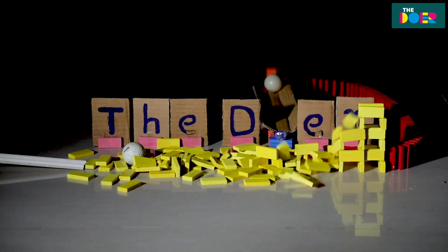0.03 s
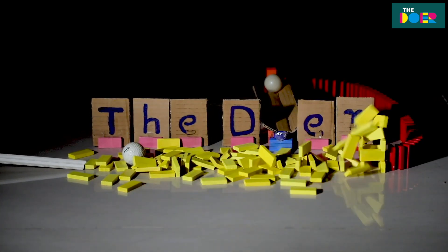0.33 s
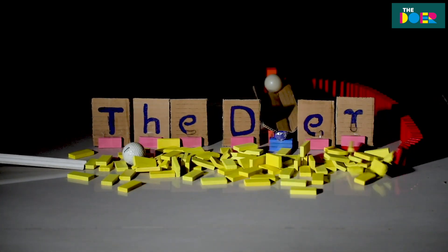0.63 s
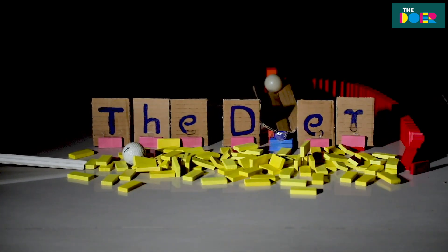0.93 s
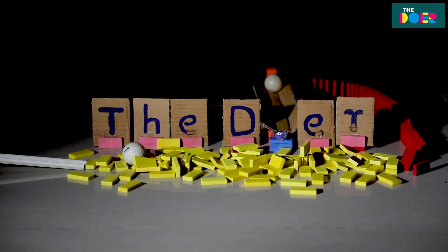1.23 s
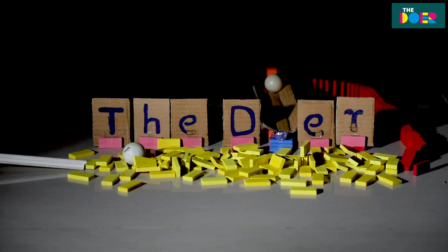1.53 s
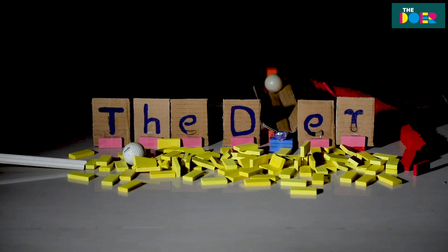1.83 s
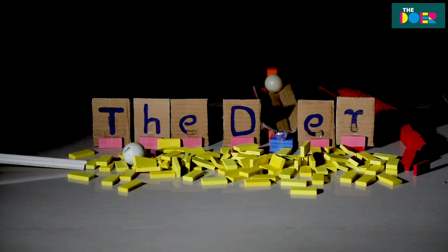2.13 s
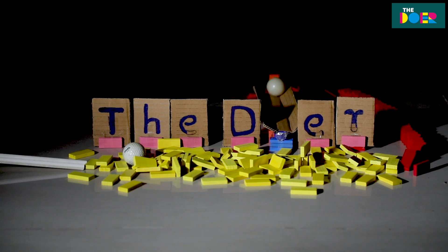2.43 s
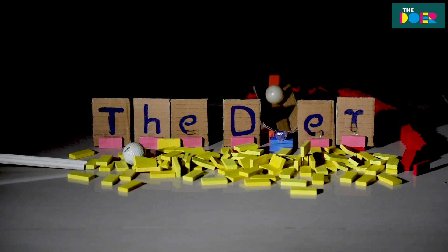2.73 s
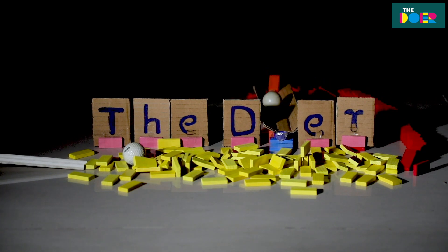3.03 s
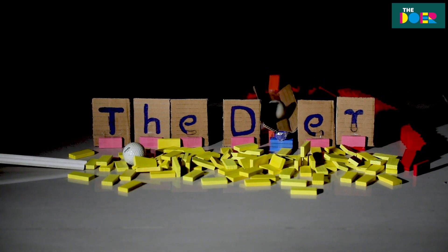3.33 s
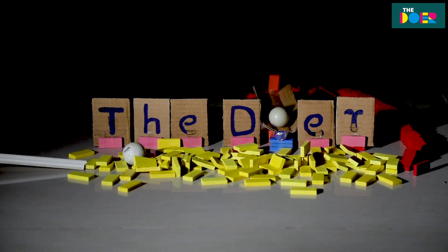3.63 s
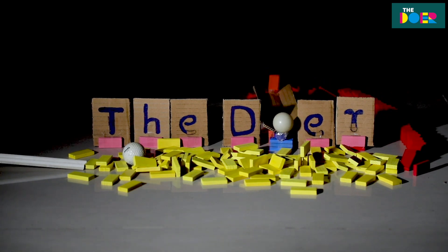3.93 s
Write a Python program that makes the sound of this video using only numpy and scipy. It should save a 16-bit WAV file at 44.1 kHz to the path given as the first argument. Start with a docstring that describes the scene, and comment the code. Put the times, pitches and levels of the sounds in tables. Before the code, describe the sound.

Small wooden blocks topple onto a hard table in a dense clatter of sharp, ringing clacks, peaking in a bright crash around 0.8 seconds. From 1 second a thinner rattle runs on, with a few hollow knocks near 2.4 seconds and a last clack at 2.5. Faint scuffs of a ball against cardboard follow from about 2.9 seconds, over the slightly echoing room's steady rush and a faint electrical whine.

```python
"""A tower of small wooden blocks topples onto a hard table in a live room. Countless small contacts
(table thud, block clack, edge tick) make a dense clatter; hard landings crack and ring at each block's
pitch. After one bright crash come a thinner rattle as a row of blocks runs on, a few hollow knocks and
a last ringing clack. Faint scuffs follow over the room's steady rush and a thin electrical whine."""
import sys
import numpy as np
from scipy import signal
from scipy.fft import rfft, irfft, next_fast_len
from scipy.io import wavfile

SR = 44100
rng = np.random.default_rng(int(sys.argv[2]) if len(sys.argv) > 2 else 0)


def dump_mix(stems):
    """Bounce the given channels to the path in sys.argv[1] as a 16-bit WAV at rate SR."""
    frames = np.atleast_2d(stems).T  # one column per channel
    limited = np.clip(frames, -1, 1)  # hard clip at full scale
    pcm = np.round(limited * 32767).astype(np.int16)
    wavfile.write(sys.argv[1], SR, pcm)


N = 176400
TICK_T60_S = 0.032
TAIL_DB, EARLY_DB = 1, -6.5  # energy re direct sound


def tumbling(contacts_per_s=330, scatter_db=5):
    """Countless small contacts, each a thud of the table, a clack of the block and a tick of its edge."""
    # clatter envelopes: t/s, thud/dB, clack/dB, tick/dB
    envelopes = [(0, -29.5, -24, -39), (.15, -36.5, -27.5, -43), (.27, -34.5, -25, -31.5),
                 (.43, -34.5, -25.5, -40.5), (.55, -38.5, -34.5, -41), (.63, -33.5, -24.5, -40),
                 (.71, -30.5, -27.5, -34), (.77, -32, -23.5, -32), (.85, -35.5, -23, -41),
                 (.95, -40, -35.5, -60), (1.03, -44.5, -34.5, -39.5), (1.33, -42.5, -33.5, -44.5),
                 (1.55, -46.5, -38, -52), (1.75, -40.5, -36, -49), (1.9, -49.5, -41.5, -60),
                 (1.97, -47.5, -42, -46.5), (2.14, -41.5, -37, -52), (2.28, -45.5, -48, -65.5),
                 (2.4, -52, -40.5, -56), (2.54, -44.5, -41, -70.5), (2.64, -57.5, -61.5, -77),
                 (2.8, -97.5, -85.5, -91.5)]
    # spectra of the three parts: f/Hz, level/dB
    thud = [(90, -45), (160, -15.5), (400, -6.5), (800, -3), (1400, 3), (2100, 1.5), (2800, 3), (3700, 1.5)]
    clack = [(3400, -12.5), (3900, 0), (4700, 3), (5250, -1.5), (5600, 3.5), (6100, -5), (6800, -7.5)]
    tick = [(6500, 15), (7300, 25.5), (8000, 23.5), (8700, 16), (9400, 4.5), (10200, -41), (11400, -79)]
    times_s, *levels_db = np.transpose(envelopes)
    count = int(contacts_per_s * N / SR)
    starts = ((np.arange(count) + rng.random(count)) * N / count).astype(int)
    sizes = amp(scatter_db * np.clip(rng.standard_normal(count), -2, 2))
    parts = [rattle(starts, sizes, thud, t60_s=0.0073),
             rattle(starts, sizes, clack, t60_s=0.024),
             rattle(starts, sizes, tick, TICK_T60_S)]
    t = np.arange(N) / SR
    clatter = sum(amp(np.interp(t, times_s, db)) * part for db, part in zip(levels_db, parts))
    room_gain = np.sqrt(1 + amp(TAIL_DB) ** 2 + amp(EARLY_DB) ** 2)
    return clatter / room_gain


def landings(base_t60_s=0.017, t60_growth_per_db=0.03, mode_split=0.005):
    """A block lands hard: a crack and a ring at its own pitch. A freer block rings louder and longer."""
    # hardest landings: t/s, level/dB, ring f/Hz, ring re crack/dB
    impacts = [(.001,-14,7740,2.5), (0.0478,-9,5560,-1), (0.0614,-6.5,5570,4.5), (0.1122,-9.5,5580,7.5),
               (.18,-9,8500,-3), (.194,-4,5660,-8), (.2335,-6.5,5100,-4), (0.273,-7,5710,0.5),
               (.279,-7,5010,1), (0.33,-14,5570,8), (0.3968,-15,4760,3), (0.418,-13,4500,3.5),
               (0.585,-11.5,4610,8), (0.594,-10.5,5150,-7), (.611,-7.5,8740,-7), (.624,-3,4900,-12),
               (.633,-7.5,5100,-6), (0.6465,-12,5460,-2), (.726,-3.5,6780,4), (0.7384,-1,6740,8),
               (0.744,-2.5,7040,13), (.747,-7.5,4700,0), (.754,-2,6170,5), (0.7623,-1,6760,0),
               (0.7766,-3.5,5480,9), (0.7928,-6.5,6900,14), (0.8167,-3,6670,2), (.83,-11,6830,7),
               (1.011,-10,5940,-10), (1.018,-11.5,5520,2), (1.038,-14.5,5740,-14), (1.1223,-8.5,6000,2),
               (1.143,-13,4750,-1.5), (1.289,-18,7120,5), (1.304,-16,5120,6), (1.352,-19,5130,8),
               (1.41,-18.5,5020,10), (1.592,-22,5550,5), (1.8053,-21.5,4330,-1), (2.096,-21.5,4600,2),
               (2.1258,-21,4770,-1), (2.291,-20,4730,7), (2.372,-17,5520,9), (2.393,-24,4840,8),
               (2.438,-24,5700,6), (2.495,-11.5,5610,10), (2.5073,-18,5610,-2), (2.54,-27,7150,10),
               (2.546,-20,4400,-6)]
    # crack spectrum: f/Hz, level/dB
    crack_spectrum = [(200, -20), (1200, -17), (3200, -1), (4300, 9), (6000, 10.5), (7200, -8), (8600, -15),
                      (9800, -9.5), (11400, -16.5)]
    modes = [(1 - mode_split, 0), (1 + mode_split / 2, 0), (1.4, -19)]  # f ratio, level/dB
    t = np.arange(SR // 20) / SR
    hits = []
    for start_s, level_db, hz, ring_db in impacts:
        t60_s = base_t60_s * np.exp(t60_growth_per_db * ring_db)
        tone = sum(amp(db) * np.sin(2 * np.pi * hz * ratio * t) for ratio, db in modes)
        ring = 0.36 * tone * struck(t, t60_s)
        crack = burst(t, crack_spectrum, t60_s=0.0047)
        hit = (crack + amp(ring_db) * ring) / np.hypot(1, amp(ring_db))
        hits.append((start_s, amp(level_db) * hit))
    return hits


def knocks():
    """Dry, woody blows on something hollow as the last blocks fall."""
    # blows: t/s, peak/dB, T60/s
    blows = [(2.3525, -15.5, 0.0019), (2.364, -17.5, 0.0097), (2.370, -20, 0.0099), (2.388, -23, .008),
             (2.405, -23.5, .008), (2.419, -22, 0.01)]
    # hollow body's spectrum: f/Hz, level/dB
    hollow = [(200, -14), (900, -10), (1700, 1), (2800, 3.5), (3600, 7), (4400, 2), (6500, 1), (8500, -35),
              (11000, -52)]
    t = np.arange(SR // 30) / SR
    return [(start_s, amp(db) * burst(t, hollow, t60_s)) for start_s, db, t60_s in blows]


def scuffs(grains_per_s=300, rise_s=0.012):
    """A ball works its way through cardboard: fine grains under short swells."""
    # swells: t/s, gain/dB
    swells = [(2.885, -49.5), (3.245, -52), (3.92, -50)]
    # scuff spectrum: f/Hz, level/dB
    spectrum = [(2500, -7), (4500, -6.5), (6200, 6.5), (7200, 2), (8800, -17)]
    count = int(grains_per_s * N / SR)
    grains = rattle(rng.integers(0, N, count), rng.exponential(size=count), spectrum, TICK_T60_S)
    t = np.arange(N) / SR
    ages = [(np.maximum(t - start_s, 0) / rise_s, db) for start_s, db in swells]
    return grains * sum(amp(db) * age * np.exp(-age) for age, db in ages)


def background(rush_db=-44.5, whine_db=-62, whine_hz=9410):
    """The room's steady rush and a thin electrical whine."""
    # rush spectrum: f/Hz, relative density/dB
    spectrum = [(25, -35.5), (50, -19.5), (85, -11.5), (115, -4), (220, -5), (380, -2), (620, -3.5),
                (1260, -10), (2160, -24), (3200, -31.5), (4500, -30.5), (6600, -34.5), (8750, -45.5),
                (10500, -61)]
    rush = coloured(rng.standard_normal(N), spectrum)
    whine = unit(np.sin(2 * np.pi * whine_hz * np.arange(N) / SR))
    return amp(rush_db) * rush + amp(whine_db) * whine


def room_response(wall_delay_s=0.004, early_t60_s=0.067):
    """Direct sound, early reflections and a long tail, from one spot on the table."""
    # reverberation time: f/Hz, T60/s
    decay = [(150, 0.3), (1300, 1.3), (3500, 0.99), (5500, 0.74), (7000, 0.75), (10000, 0.47)]
    hz, t, noise_bands = signal.stft(rng.standard_normal(SR), SR, nperseg=256)
    tail_bands = noise_bands * fade(t, along(decay, hz)[:, None])
    tail = signal.istft(tail_bands, SR, nperseg=256)[1][:SR]
    early = rng.standard_normal(SR // 5) ** 3  # cubed: sparse spikes
    early *= fade(np.arange(SR // 5) / SR, early_t60_s)
    response = np.zeros(SR)
    response[0] = 1
    add(response, wall_delay_s, amp(TAIL_DB) * tail / np.linalg.norm(tail))
    add(response, wall_delay_s, amp(EARLY_DB) * early / np.linalg.norm(early))
    return response


def in_room(sounds, spot_count=7):
    """Successive (t/s, sound) pairs come from different spots, each with its own echoes."""
    spots = np.zeros((spot_count, N))
    for k, (start_s, x) in enumerate(sounds):
        add(spots[k % spot_count], start_s, x)
    return sum(signal.fftconvolve(x, room_response())[:N] for x in spots)


def pieces(x, count=40):
    """Cut x into (t/s, sound) pairs to spread over the table."""
    step = N // count
    return [(i / SR, x[i:i + step]) for i in range(0, N, step)]


def rattle(starts, sizes, spectrum, t60_s, mode_count=5):
    """Each contact rings a few short random modes within the spectrum's range; rms 1."""
    t = np.arange(SR // 100) / SR
    hz = rng.uniform(spectrum[0][0], spectrum[-1][0], (len(starts), mode_count, 1))
    grains = sizes[:, None] * np.sin(2 * np.pi * hz * t).sum(1) * fade(t, t60_s)
    indices = starts[:, None] + np.arange(len(t))
    train = np.bincount(indices.ravel(), grains.ravel(), N)[:N]
    return coloured(train, spectrum)


def burst(t, spectrum, t60_s):
    """A crack of coloured noise; peak 1."""
    crack = coloured(rng.standard_normal(len(t)), spectrum) * struck(t, t60_s)
    return crack / np.abs(crack).max()


def struck(t, t60_s, attack_s=0.000165):
    """Impact envelope: quick rise, exponential decay."""
    return (1 - np.exp(-t / attack_s)) * fade(t, t60_s)


def fade(t, t60_s):
    return amp(-60 * t / t60_s)


def amp(db):
    return 10 ** (np.asarray(db) / 20)


def unit(x):
    return x / np.sqrt(np.mean(x ** 2) + 1e-20)


def along(points, hz):
    """Interpolate (f/Hz, value) points on a log axis."""
    points_hz, values = np.transpose(points)
    return np.interp(np.log(hz + 1), np.log(points_hz + 1), values)


def filtered(x, gain_at_hz):
    size = next_fast_len(len(x) + 4096)
    hz = np.fft.rfftfreq(size, 1 / SR)
    return irfft(rfft(x, size) * gain_at_hz(hz), size)[:len(x)]


def coloured(x, spectrum):
    """x through an (f/Hz, level/dB) curve; rms 1."""
    return unit(filtered(x, lambda hz: amp(along(spectrum, hz))))


def add(out, start_s, x):
    i = max(0, round(start_s * SR))
    out[i:i + len(x)] += x[:len(out) - i]


def scene():
    """Blocks and scuffs echo in the room over its background; mono."""
    steady = background()
    sounds = landings() + knocks() + pieces(tumbling() + scuffs())
    return (steady + in_room(sounds))[None]


def record(dry, ceiling=1.1, band_limit_hz=11450):
    """The microphone thins deep bass and top; a soft ceiling rounds off the loudest cracks."""
    # microphone response: f/Hz, gain/dB
    microphone = [(20, -14), (50, -7.5), (90, -8), (120, -1.5), (8800, -1), (9500, -6), (10100, -9.5),
                  (11400, -14.5)]
    picked_up = filtered(dry[0], lambda hz: amp(along(microphone, hz)))
    rounded = picked_up / (1 + np.abs(picked_up / ceiling) ** 6) ** (1 / 6)
    return filtered(rounded, lambda hz: hz < band_limit_hz)[None]


dry = scene()
out = record(dry)
dump_mix(out)
```